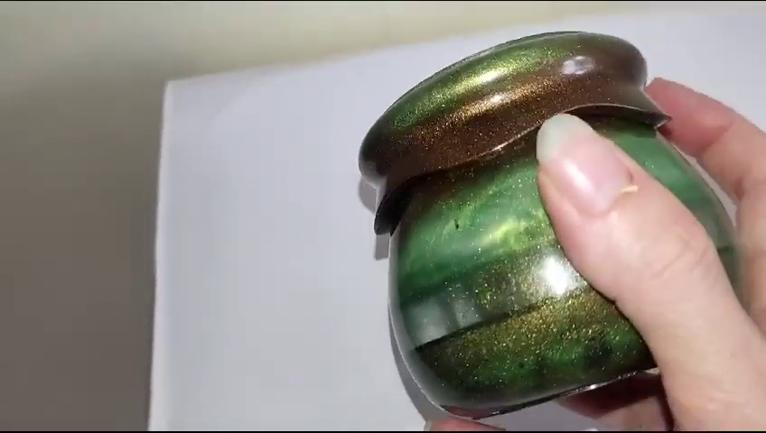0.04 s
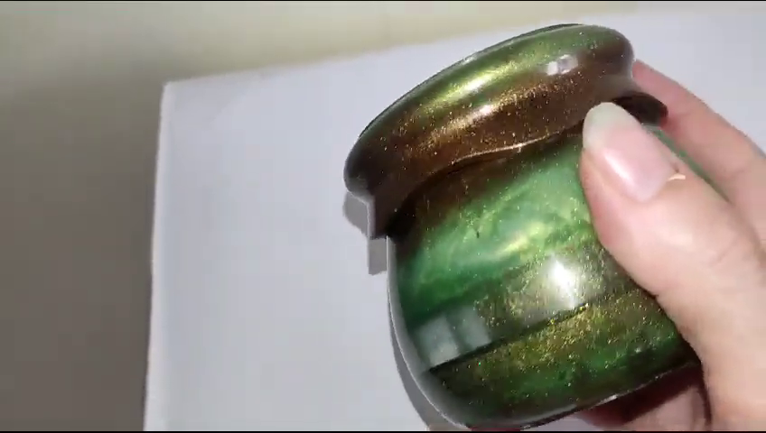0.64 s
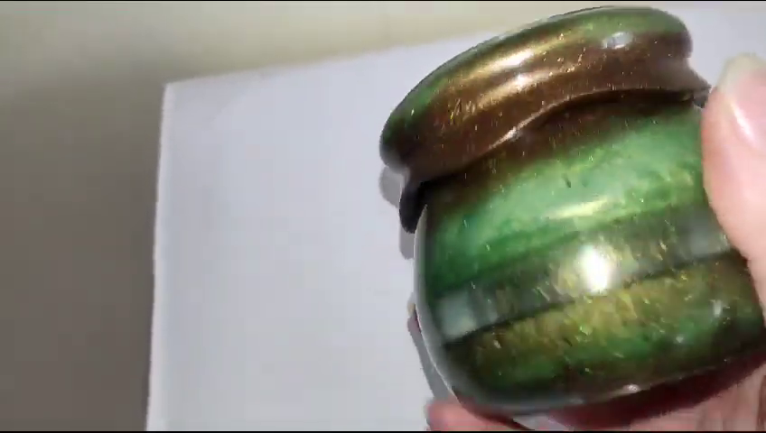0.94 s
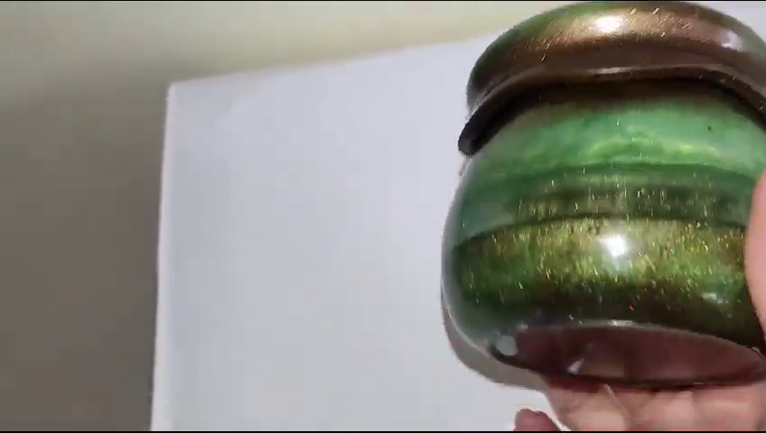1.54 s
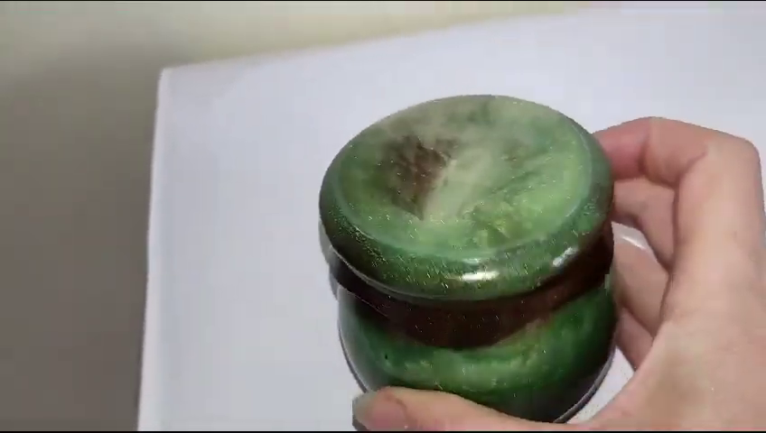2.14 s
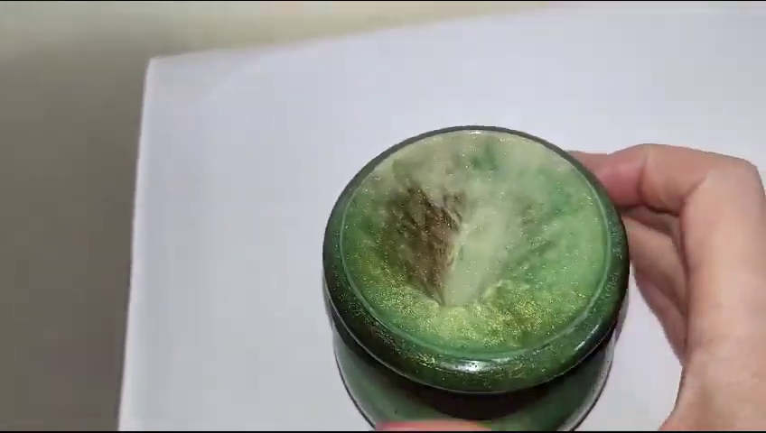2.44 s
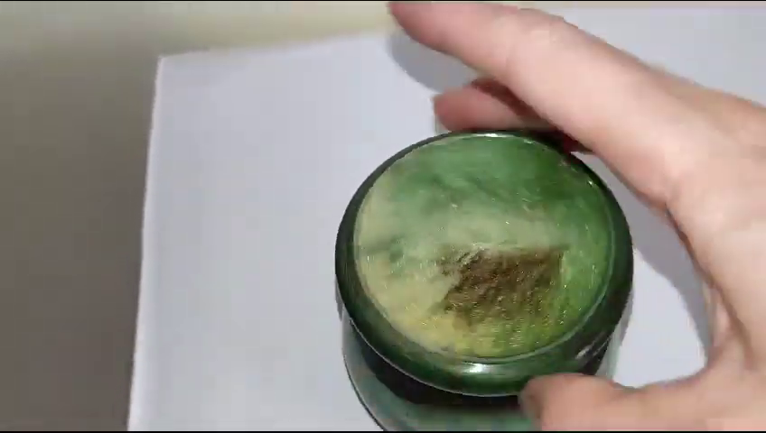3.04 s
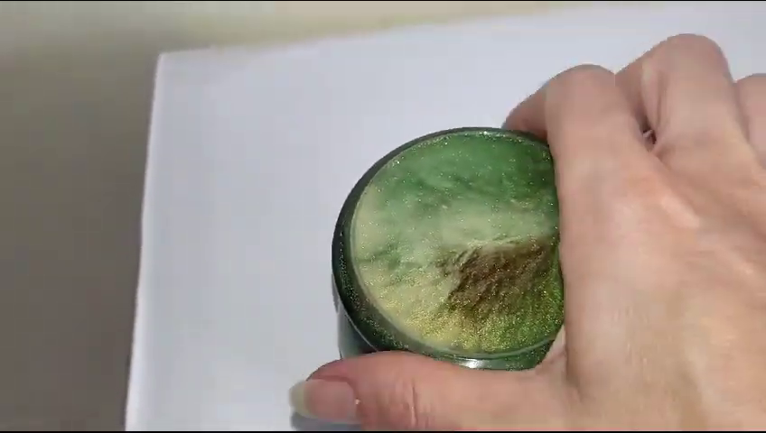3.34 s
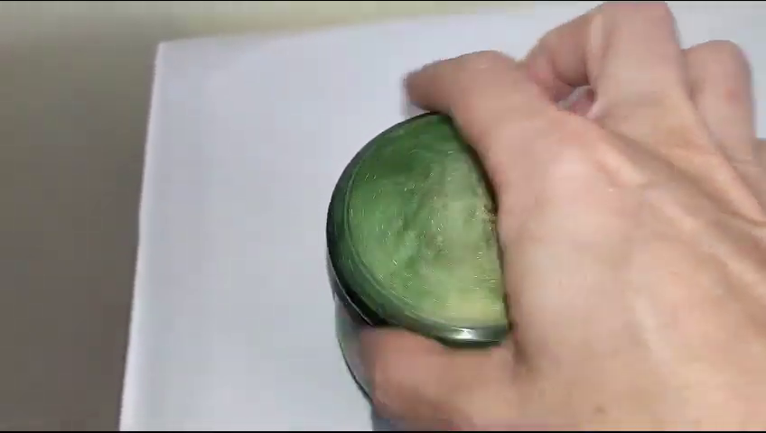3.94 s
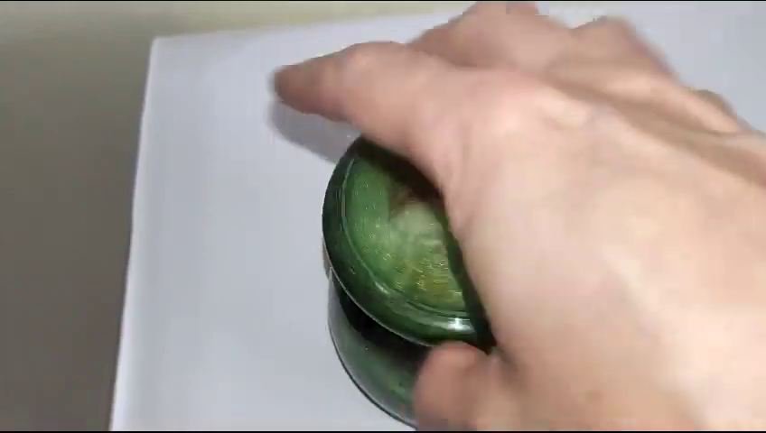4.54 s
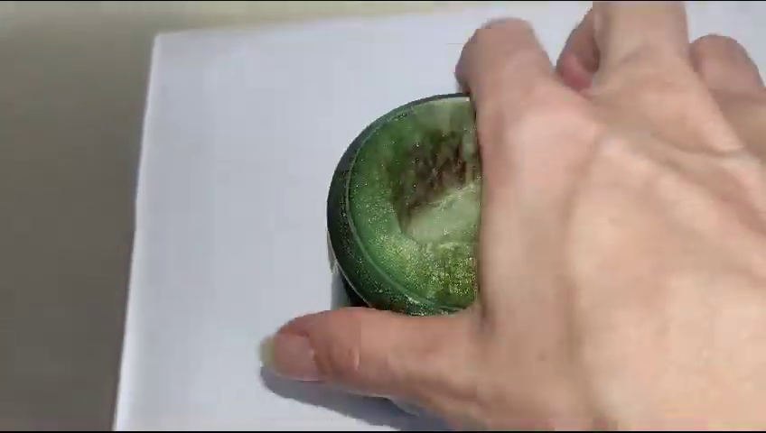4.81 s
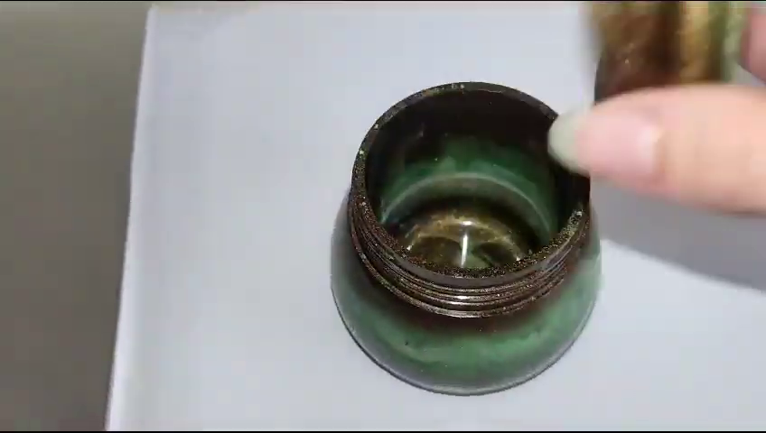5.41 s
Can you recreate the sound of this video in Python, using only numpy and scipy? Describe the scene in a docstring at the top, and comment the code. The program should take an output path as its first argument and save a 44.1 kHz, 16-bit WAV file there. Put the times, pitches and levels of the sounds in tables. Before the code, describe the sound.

Fingers rub softly on a hard resin jar while its loose lid ticks against it. The jar is set down on a paper-covered desk with a hollow knock and rocks briefly. The lid is then unscrewed in five short, gritty scrapes mixed with small clacks, and comes free with a sharp click and a faint hollow ring. The sound is close, slightly to the right, in a small quiet room with faint hiss.

```python
"""Handling and opening a resin jar

A cast resin jar is turned in one hand, set down on a paper-covered desk, and its lid is twisted off.
Impacts of nails, loose lid and base excite damped modes of the jar and the desk. Stick-slip friction
of skin and screw thread gives short scrapes, and the air in the jar resonates as the lid comes free.
The desk and a small, quiet room reverberate after each blow, over a faint steady hiss."""
import sys
import numpy as np
from scipy import signal
from scipy.fft import rfft, irfft, next_fast_len
from scipy.io import wavfile
from scipy.ndimage import uniform_filter1d

SR = 44100
rng = np.random.default_rng(int(sys.argv[2]) if len(sys.argv) > 2 else 0)


def unload_wav(signal):
    """Save mono or channel-first audio to the path in sys.argv[1] as 16-bit WAV at rate SR, clipped to [-1, 1]."""
    wavfile.write(
        sys.argv[1],
        SR,
        np.round(np.clip(np.atleast_2d(signal).T, -1, 1) * 32767).astype(np.int16),
    )


N = 250047
RESPONSE_SAMPLES = 32768

# Spectrum of still air and microphone hiss: f/Hz, relative density/dB
AIR_SPECTRUM = [(12, -8), (20, 8.5), (36, -16), (70, -19.5), (205, -25.5), (263, -25), (328, -27),
                (555, -33), (940, -35), (1880, -37.5), (2040, -37), (4200, -41), (11100, -37), (13800, -42),
                (15000, -61)]
# Incoherence of a diffuse field between the channels: f/Hz, 0 (alike) to 1 (unrelated)
INCOHERENCE = [(25, 1), (70, 0.18), (160, 0.69), (400, 0.81), (1000, 0.99)]
# Shape of the left-right level difference: the jar is louder on the right, and the microphones
# resonate near 8.5 kHz (right) and 10.8 kHz (left): f/Hz, level/dB
CHANNEL_DIFFERENCE = [(300, 0.5), (600, -2.5), (1100, -9), (2000, -14), (4000, -5.5), (8500, -11.5),
                      (10800, 5.5), (14000, -2)]
# Reverberation time of the room: f/Hz, T60/s
REVERB_TIMES = [(100, 0.62), (300, 0.31), (800, 0.29), (2000, 0.38), (9000, 0.3)]
# Spectrum of the scattered echoes: f/Hz, level/dB
ECHO_SPECTRUM = [(80, -6.5), (300, -4.5), (620, -1.5), (950, -3), (1400, 0.5), (2100, -5), (4500, -3.5),
                 (9000, -2.5)]
# Standing waves of desk and room: f/Hz, gain/dB, T60/s
STANDING_WAVES = [(79.9, 7.5, 0.71), (98.6, -1.5, 0.48), (127.1, -7.5, 0.37), (165.8, 4, 0.36),
                  (215, 2.5, 0.9), (250.6, 2, 0.26), (298.4, 10.5, 0.28), (323.3, 7.5, 0.38),
                  (389.6, 8, 0.25), (458.4, 5.5, 0.34), (609, -4.5, 0.48), (821, -0.5, 0.51)]
# Air modes of the open jar: f/Hz, level/dB, T60/s
CAVITY_MODES = [(295.4, -33, 0.43), (844, -33.5, 0.073)]

# Bright hiss of rubs and ticks, with the microphone's resonance near 8.5 kHz: f/Hz, relative density/dB
HISS_SPECTRUM = [(1500, -23), (2900, -10), (4300, -4), (5800, -13.5), (7200, -2.5), (8500, 6.5), (9600, 3),
                 (11000, -0.5), (12500, -11), (15000, -19)]
# Spectra of the gritty thread and the rubbed body: f/Hz, relative density/dB
THREAD_SPECTRUM = [(500, 0.5), (950, -2), (1350, -11.5), (2050, 1), (2450, -8), (2900, -14), (4300, -10.5),
                   (6000, -17.5)]
BODY_SPECTRUM = [(60, -46), (110, -9), (155, 8), (230, -9.5), (310, 3.5), (440, -6), (620, -4), (850, -19),
                 (1300, -32)]
# Twists of the lid: t/s, duration/s, hiss/dB, rasp/dB, judder/dB
LID_TWISTS = [(2.969, 0.19, -49, -47.5, -46), (3.452, .21, -49, -55, -48),
              (3.947, 0.19, -51.5, -52.5, -44.5), (4.482, 0.213, -50.5, -51.5, -49.5),
              (4.913, 0.254, -58, -61, -42.5)]
# Rubs of fingers on the jar and of its base on paper: t/s, duration/s, hiss/dB, rumble/dB
LIGHT_RUBS = [(0.294, 0.066, -52, -63.5), (0.43, 0.068, -58.5, -87), (0.788, 0.18, -63, -70.5),
              (1.435, 0.23, -61.5, -72), (1.576, 0.17, -60, -51.5), (1.716, 0.089, -58.5, -50.5),
              (2.049, 0.18, -61, -41), (2.399, .15, -64, -47), (2.592, .17, -57, -58.5),
              (2.904, 0.086, -56.5, -49), (4.436, 0.068, -59, -62), (5.171, 0.3, -65, -47.5)]

# Modes of the hand-damped jar on the desk: f/Hz, relative level/dB, T60/s
JAR_MODES = [(89.4, -7, 0.086), (113.5, 0.5, 0.066), (149, 6.5, 0.046), (294.3, 1, 0.017),
             (371.5, -10.5, 0.037), (616, 1, 0.02), (660, -17, 0.0076), (1080, -42, 0.0038),
             (1238, 2, 0.0088), (1616, -4.5, 0.0091), (1913, 15, 0.0046), (2260, -10, 0.016),
             (3130, 37, 0.0049), (4100, -8, 0.009), (4670, -9.5, 0.0048), (9300, 8, 0.0017)]
# The five bands of an impact (desk thump, hollow, base knock, wall clack, tick):
# low f/Hz, high f/Hz, gain/dB, contact noise/dB, its T60/s, rise/s, room feed/dB
IMPACT_BANDS = [(77, 182, -5, -11.5, 0.023, 0.00097, 6.5), (218, 598, -0.5, -10, 0.096, 0.00033, 0),
                (398, 995, -0.5, -8, 0.015, 0.00032, -2), (850, 2206, -1, -11.5, 0.028, 0.00083, -3),
                (2440, 14000, 0, 18, 0.012, 0.0017, -5)]
# The jar lowered, set down and rocked: t/s, level/dB, hardness/(dB per octave), desk boom offset/dB
DESK_THUMPS = [(1.601, -47, -10, 2.5), (2.068, -21.5, -4, -4), (2.403, -31, 3.5, 1.5),
               (2.526, -40.5, 2, -4.5), (2.802, -46, .5, -13), (4.491, -36, 3.5, -15)]
# The loose lid against the jar: t/s, level/dB, hardness/(dB per octave), rim tick offset/dB
LID_KNOCKS = [(0.212, -55.5, 2, -4), (0.517, -44, -6.5, -24), (0.574, -59.5, 0, -24), (1.021, -40, 1.6, -5),
              (1.111, -37.5, 2.5, 1), (1.169, -41, 5, -16), (1.211, -43, 1, -29), (1.384, -45, -3.5, -16),
              (1.468, -55, -6, -6), (1.577, -51, -5.5, -5.5), (1.725, -47, -4, -8), (2.872, -48, -5, -17),
              (2.982, -41, -0.5, -5), (3.008, -44.5, 6, -4), (3.021, -42.5, -2.5, -1.5),
              (3.052, -52.5, 8, 8), (3.132, -38, 1.5, -26), (3.16, -39, -1.5, -15),
              (3.427, -50.5, -4.5, -13), (3.468, -46, -0.5, -17), (3.628, -38.5, 0, -29),
              (3.964, -32, 1, 0.5), (3.972, -37.5, 2, 2), (4.082, -40, 1, -7.5), (4.109, -46.5, 3.5, -16),
              (4.607, -39, -4.5, -14), (4.663, -37, -0.5, -26), (4.678, -39.5, -3.5, -24),
              (4.933, -35, -0.5, -8.5), (4.962, -49, 8.5, -16), (4.996, -35, 1.5, -1.5),
              (5.042, -40.5, -2, -5), (5.103, -43, -10.5, -8.5), (5.244, -36.5, 1, 10)]
# Clicks of a fingernail or the lid's edge: t/s, level/dB
LIGHT_CLICKS = [(1.206, -41), (1.448, -40), (2.977, -39), (3.869, -46), (4.903, -36), (5.294, -41),
                (5.323, -30)]
# Band weights of each kind of impact: desk/dB, hollow/dB, base/dB, wall/dB, tick/dB
THUMP_WEIGHTS = (1, -3.5, 1.5, -12, -18.5)
KNOCK_WEIGHTS = (-12.5, 0, -4.5, -5.5, -2)
CLICK_WEIGHTS = (-30, -25, -19, -14.5, -1)


def undb(db):
    """Amplitude ratio of a level in decibels."""
    return 10 ** (np.asarray(db) / 20)


def unit(x):
    """Normalisation to unit rms."""
    return x / np.sqrt(np.mean(x ** 2))


def on_log_axis(points, hz):
    """Interpolation of (f/Hz, value) points in log frequency."""
    f, value = np.transpose(points)
    return np.interp(np.log(hz + 1e-3), np.log(f), value)


def colour(x, points, depth=1):
    """Zero-phase filtering by a (f/Hz, level/dB) curve, its levels multiplied by depth."""
    n = x.shape[-1]
    size = next_fast_len(n + 1024)
    gain = undb(depth * on_log_axis(points, np.fft.rfftfreq(size, 1 / SR)))
    return irfft(rfft(x, size) * gain, size)[..., :n]


def fluctuation(rate_hz):
    """Slow random modulation: held values smoothed by two moving averages."""
    hold = max(int(SR / rate_hz), 1)
    steps = np.repeat(rng.standard_normal(N // hold + 1), hold)
    return unit(uniform_filter1d(uniform_filter1d(steps, hold), hold)[:N])


def diffuse_field(n):
    """Noise arriving from all directions is only partly coherent at two points."""
    mid, side = rfft(rng.standard_normal((2, n)))
    angle = np.pi / 4 * np.clip(on_log_axis(INCOHERENCE, np.fft.rfftfreq(n, 1 / SR)), 0, 1)
    return irfft(mid * np.cos(angle) + np.outer([1, -1], side * np.sin(angle)), n)


def direct_path(x, lag_s=0.00021):
    """Path difference and microphone resonance: levels differ; the left lags up to a quarter cycle."""
    size = next_fast_len(len(x))
    phase = np.pi / 2 * np.tanh(4 * np.fft.rfftfreq(size, 1 / SR) * lag_s)
    late = irfft(rfft(x, size) * np.exp(-1j * phase), size)[:len(x)]
    return np.array([colour(late, CHANNEL_DIFFERENCE, depth=0.62),
                     colour(x, CHANNEL_DIFFERENCE, depth=-0.47)])


def still_air(level_db=-53):
    """Stationary background noise: a faint hiss over a low rumble."""
    return unit(colour(diffuse_field(N), AIR_SPECTRUM)) * undb(level_db)


def room_response(first_echo_s=0.0039, build_s=0.0027, early_db=11.5, early_s=0.01):
    """Reverberation: strong early reflections from desk and wall, a diffuse tail and standing waves."""
    n = RESPONSE_SAMPLES
    t = np.arange(n) / SR
    spectrum = rfft(colour(unit(diffuse_field(n)), ECHO_SPECTRUM))
    octave = np.round(np.log2(np.maximum(np.fft.rfftfreq(n, 1 / SR), 64)))
    onset = np.clip((t - first_echo_s) / build_s, 0, 1) * undb(early_db * np.exp(-t / early_s))
    tail = np.zeros((2, n))
    for k in np.unique(octave):
        decay = undb(-60 * t / on_log_axis(REVERB_TIMES, 2 ** k))
        tail += irfft(spectrum * (octave == k)) * unit(onset * decay)
    # each standing wave is scaled to have its listed gain at resonance
    standing = sum(undb(db - 60 * t / t60) * np.cos(2 * np.pi * hz * t) * 2 * np.log(1000) / (t60 * SR)
                   for hz, db, t60 in STANDING_WAVES)
    return tail / np.sqrt(n) + standing


def reverberate(x, room):
    """Reflected sound is the source convolved with the room's impulse response."""
    return signal.oaconvolve(x[None], room, axes=1)[:, :N]


def cavity_ring(open_s=5.248, rise_s=0.0037):
    """Cavity resonance: the air in the jar oscillates freely once the lid lets go."""
    t = np.maximum(np.arange(N) / SR - open_s, 0)
    tones = sum(np.sin(2 * np.pi * hz * t) * undb(db - 60 * t / t60) for hz, db, t60 in CAVITY_MODES)
    return direct_path(tones * (1 - np.exp(-t / rise_s)))


def friction_envelopes(hiss_power=0.78, rasp_power=0.61, judder_speed=0.39, glide_db=-12):
    """Friction noise grows as a power of sliding speed; the thread judders most while it is slow."""
    t = np.arange(N) / SR
    gains = np.zeros((3, N))  # hiss, rasp, rumble
    for start, length, hiss_db, rasp_db, judder_db in LID_TWISTS:
        on = (t > start) & (t < start + length)
        speed = np.sin(np.pi * (t[on] - start) / length)
        ratio = speed / judder_speed
        judder = ratio * np.exp((1 - ratio ** 2) / 2) + undb(glide_db) * speed
        gains[0, on] += undb(hiss_db) * speed ** hiss_power
        gains[1, on] += undb(rasp_db) * speed ** rasp_power
        gains[2, on] += undb(judder_db) * judder
    for start, length, hiss_db, rumble_db in LIGHT_RUBS:
        swell = np.interp((t - start) / length, [0, 0.19, 1], [0, 1, 0])  # quick rise, slow fade
        rasp_db = hiss_db - 8.5
        gains += np.outer(undb([hiss_db, rasp_db, rumble_db]), swell)
    return gains


def stick_slip(spectrum, rate_hz, scatter_db):
    """Stick-slip motion: a filtered Poisson train of tiny releases of random size."""
    sizes = undb(scatter_db * np.minimum(rng.exponential(size=N), 4.5)) * rng.standard_normal(N)
    releases = sizes * (rng.random(N) < rate_hz / SR)
    return unit(colour(releases, spectrum))


def scrapes(room, hiss_db=-2, rasp_db=-1, rumble_db=-2, room_db=-4, uneven_db=2, diffuse_db=-9):
    """Sliding friction: skin hisses on resin, the thread rasps, coarse slips shake the hollow body."""
    hiss_gain, rasp_gain, rumble_gain = friction_envelopes()
    hiss = stick_slip(HISS_SPECTRUM, rate_hz=4500, scatter_db=-0.5) * hiss_gain * undb(hiss_db)
    rasp = stick_slip(THREAD_SPECTRUM, rate_hz=2000, scatter_db=0) * rasp_gain * undb(rasp_db)
    rumble = stick_slip(BODY_SPECTRUM, rate_hz=900, scatter_db=2.5) * rumble_gain * undb(rumble_db)
    rub = (hiss + rasp + rumble) * undb(uneven_db * fluctuation(rate_hz=70))
    around_lid = unit(colour(diffuse_field(N), HISS_SPECTRUM)) * hiss_gain * undb(diffuse_db)
    return direct_path(rub) + around_lid + undb(room_db) * reverberate(rub, room)


def impact_levels(pivot_hz=340, landing_s=2.06, held_db=-15):
    """Harder contact tilts the spectrum toward the treble. Gives (t/s, band levels/dB) per impact."""
    centres_hz = np.array([np.sqrt(lo * hi) for lo, hi, *_ in IMPACT_BANDS])
    octaves = np.log2(centres_hz / pivot_hz)
    desk_band, *_, tick_band = np.eye(len(IMPACT_BANDS))
    events = []
    for start, db, hardness, boom_db in DESK_THUMPS:
        tilt_db = np.where(desk_band, boom_db, hardness * np.minimum(octaves, 2))
        events.append((start, db + np.array(THUMP_WEIGHTS) + tilt_db))
    for start, db, hardness, tick_db in LID_KNOCKS:
        tilt_db = np.where(tick_band, tick_db, hardness * octaves)
        # until the jar lands, only the hand carries a knock to the desk
        isolation_db = desk_band * held_db * (start < landing_s)
        events.append((start, db + np.array(KNOCK_WEIGHTS) + tilt_db + isolation_db))
    return events + [(start, db + np.array(CLICK_WEIGHTS)) for start, db in LIGHT_CLICKS]


def bandpass(x, lo_hz, hi_hz, order=3):
    """Causal, maximally flat band-pass filtering."""
    edges_hz = [lo_hz, min(hi_hz, SR / 2 - 100)]
    return signal.sosfilt(signal.butter(order, edges_hz, "band", fs=SR, output="sos"), x)


def struck_band(lo_hz, hi_hz, crack_db, crack_t60, rise_s, detune=0.026, attack_s=0.006, skirt=0.77):
    """Free vibration of one band's damped modes, detuned by the grip, with a crack of contact noise."""
    t = np.arange(RESPONSE_SAMPLES // 8) / SR
    modes = np.zeros(len(t))
    for hz, db, t60 in JAR_MODES:
        if lo_hz <= hz < hi_hz:
            gripped_hz = hz * (1 + detune * rng.standard_normal())
            modes -= undb(db - 60 * t / t60) * np.sin(2 * np.pi * gripped_hz * t)
    noise = colour(rng.standard_normal(len(t)), HISS_SPECTRUM, depth=0.85)
    crack = bandpass(noise, lo_hz, hi_hz) * undb(-60 * t / crack_t60)
    attack = slice(int(attack_s * SR))  # levels refer to this opening span
    hit = modes / np.std(modes[attack]) + undb(crack_db) * crack / np.std(crack[attack])
    hit *= 1 - np.exp(-t / rise_s)
    hit = bandpass(hit, lo_hz * skirt, hi_hz / skirt, order=2)
    return hit / np.std(hit[attack])


def impacts(room):
    """Superposition: each blow excites all five bands, heard directly and by reflection."""
    direct, to_room = np.zeros((2, N + RESPONSE_SAMPLES))
    events = impact_levels()
    for k, (lo_hz, hi_hz, gain_db, crack_db, crack_t60, rise_s, room_db) in enumerate(IMPACT_BANDS):
        for start, levels_db in events:
            hit = struck_band(lo_hz, hi_hz, crack_db, crack_t60, rise_s) * undb(levels_db[k] + gain_db)
            first = int(start * SR)
            direct[first:first + len(hit)] += hit
            to_room[first:first + len(hit)] += hit * undb(room_db)
    return direct_path(direct[:N]) + reverberate(to_room, room)


def scene():
    """The sound pressures add linearly; impacts and scrapes share one room."""
    room = room_response()
    return impacts(room) + scrapes(room) + cavity_ring() + still_air()


def record(dry):
    """Band limiting: a steep elliptic low-pass removes the top of the treble."""
    return signal.sosfilt(signal.ellip(N=8, rp=0.2, rs=70, Wn=14500, fs=SR, output="sos"), dry)


dry = scene()
out = record(dry)
unload_wav(out)
```